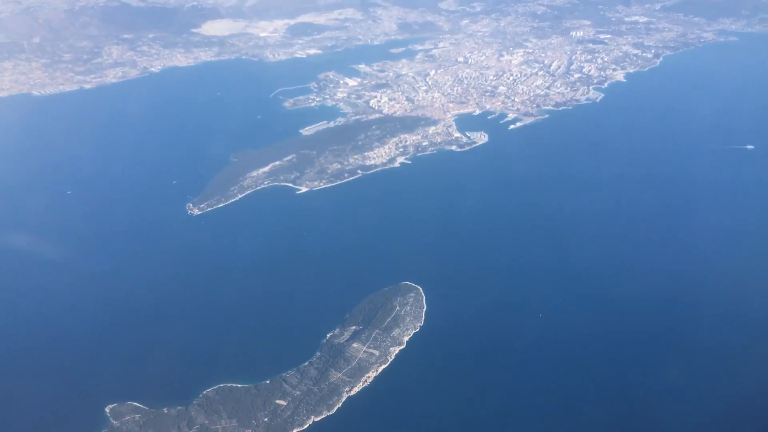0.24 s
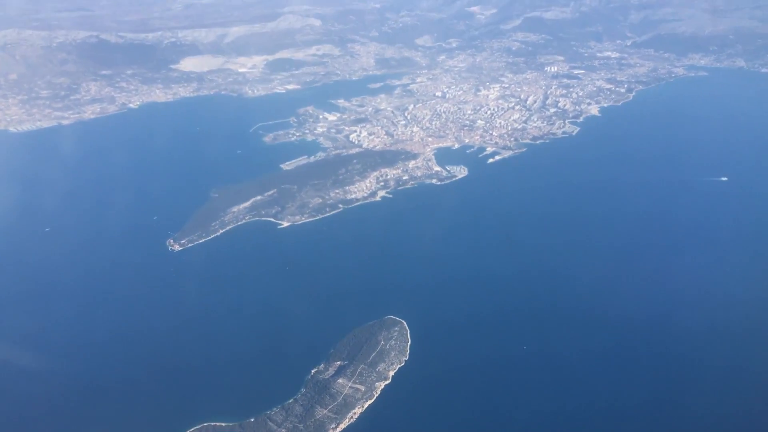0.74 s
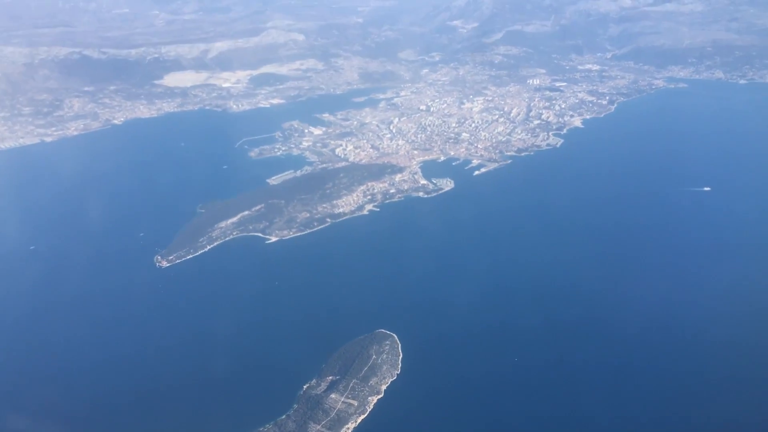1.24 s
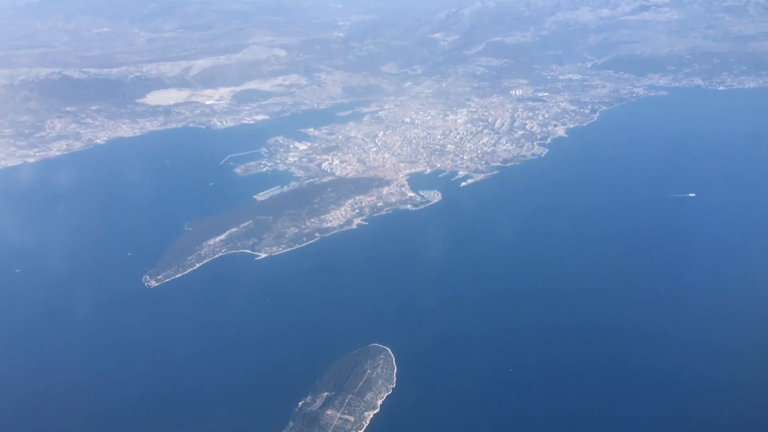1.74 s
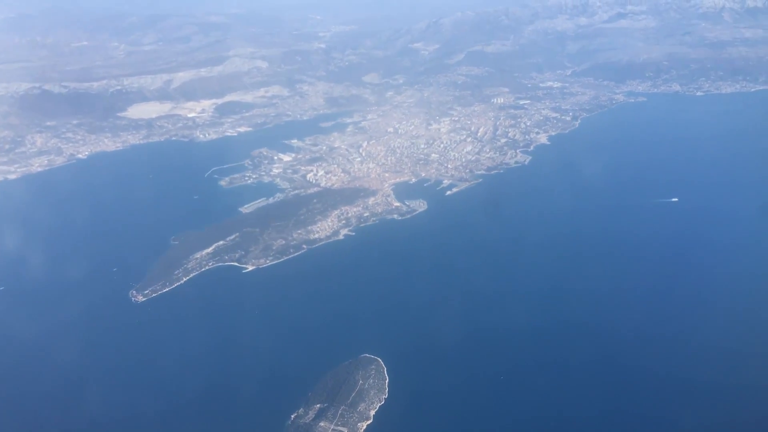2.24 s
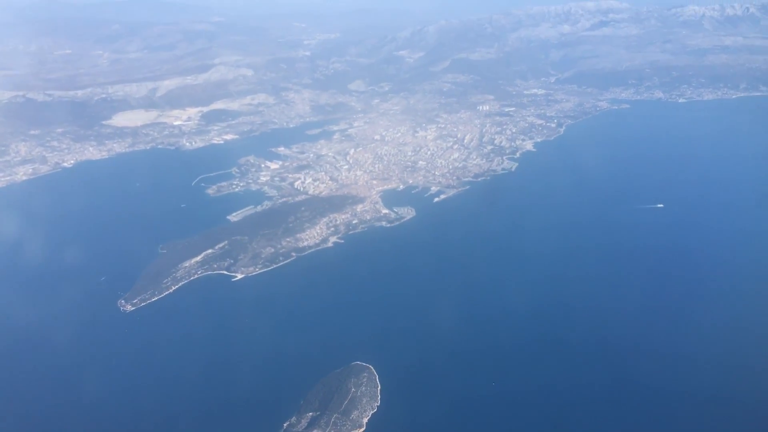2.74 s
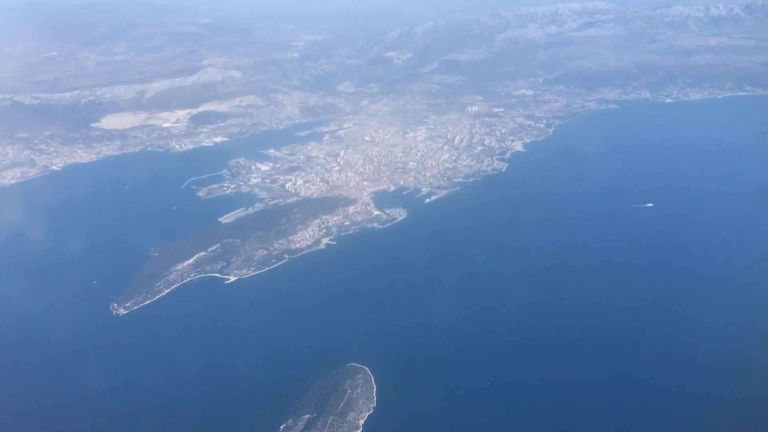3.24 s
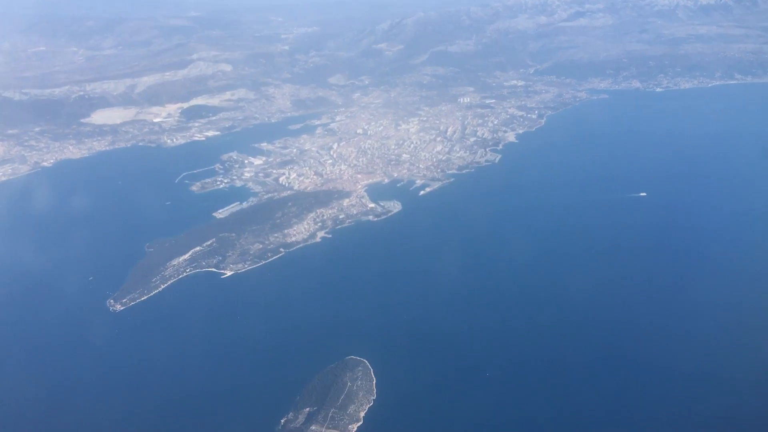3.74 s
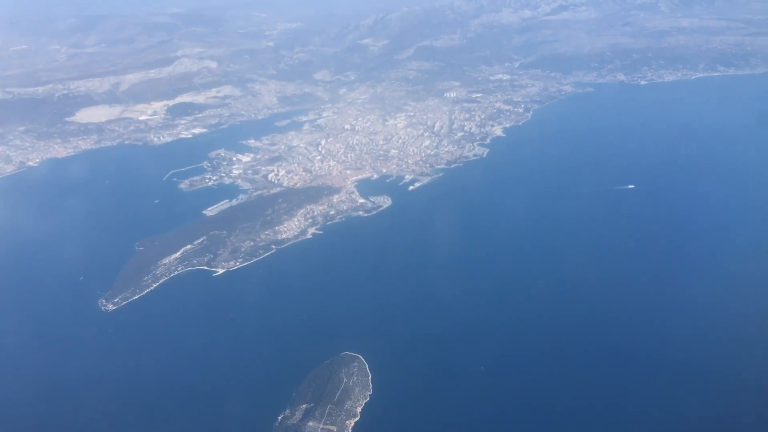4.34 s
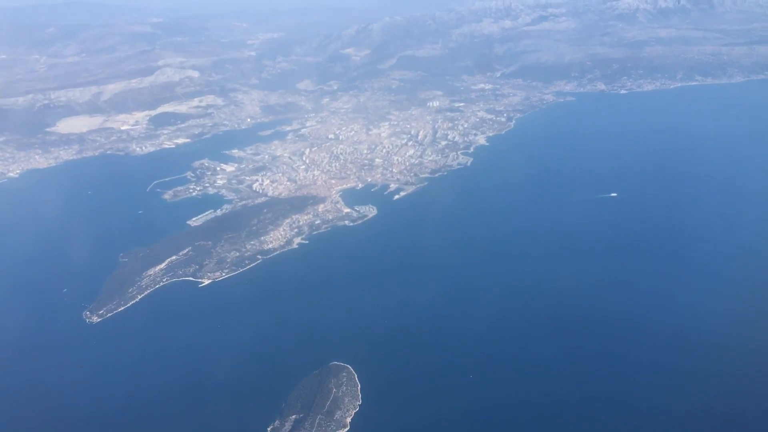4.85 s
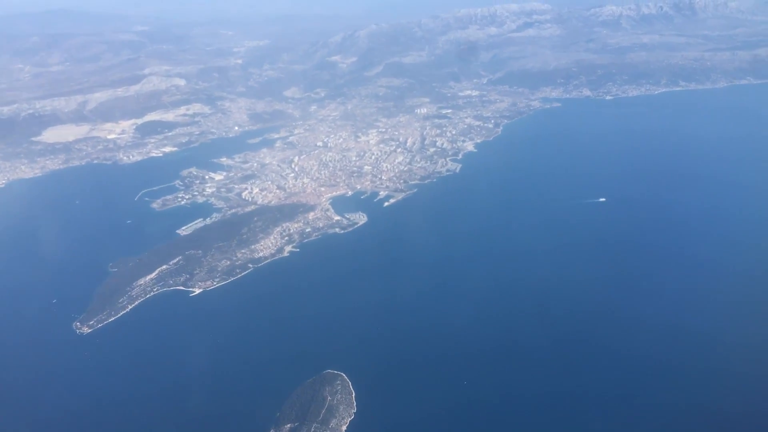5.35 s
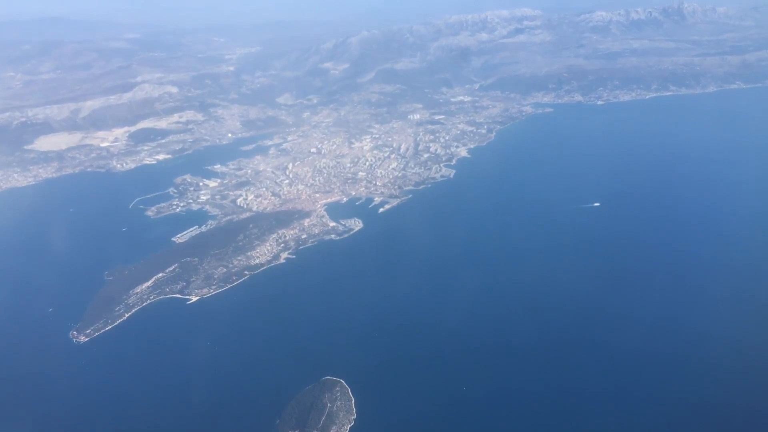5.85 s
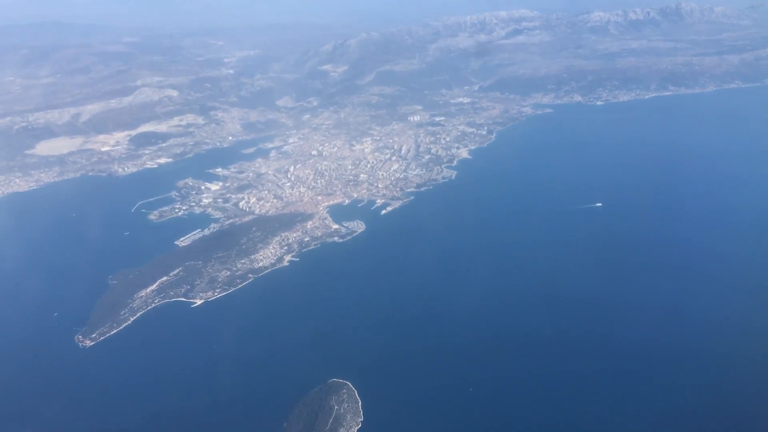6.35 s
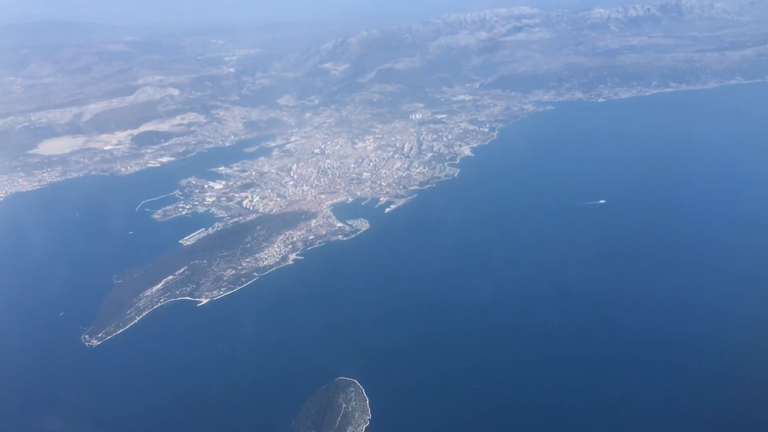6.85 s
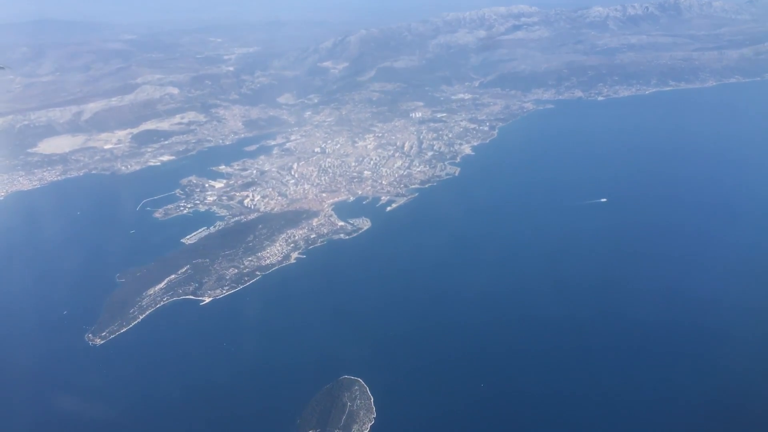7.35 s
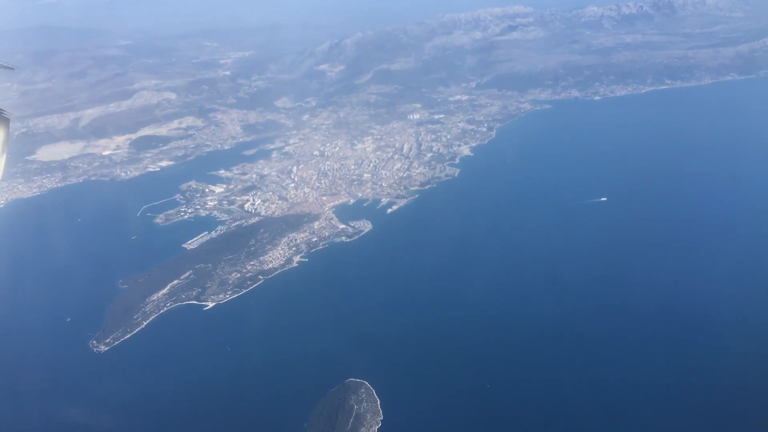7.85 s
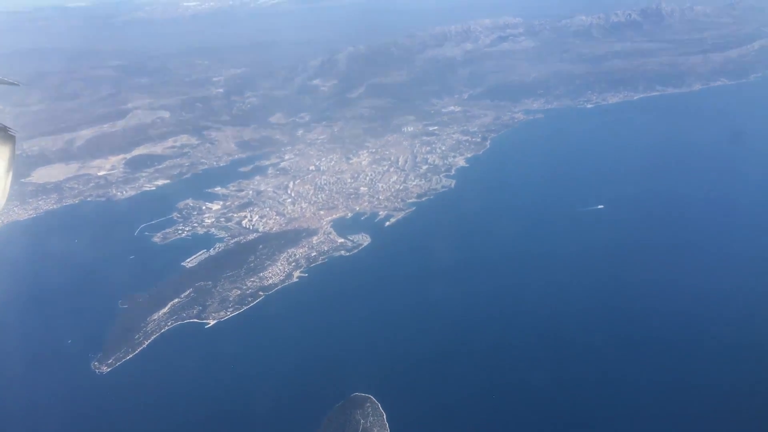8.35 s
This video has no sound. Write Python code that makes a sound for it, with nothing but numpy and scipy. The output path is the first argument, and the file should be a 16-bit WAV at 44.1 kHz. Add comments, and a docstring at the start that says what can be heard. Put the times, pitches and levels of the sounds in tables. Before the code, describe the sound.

Continuous propeller plane cabin noise from the first moment to the last, heard close to the window. A deep buzzing drone slowly beats between full and hollow, its upper octave steady, over muffled, resonant wind rush with soft flickering hiss. Thin airy whistles fade in and out and engine whines sit barely above the roar. Near six seconds come three faint dry plastic clicks. Single-channel sound whose level control gently ducks the roar under each hum swell.

```python
"""Cabin of a twin turboprop airliner in cruise, heard at a window seat.
From the start two propellers hum at one blade rate; one drifts ahead and back, so their fundamentals
nearly cancel and return while the octave stays. Shaped noise roars as airflow through the cabin's
resonances, with faint whines of fuzzy tone, and thin breathy whistles come and go. Past the middle, three
tiny ticks ring plastic modes. A slow gain control turns the roar down whenever the hum swells."""
import sys
import numpy as np
from scipy import signal
from scipy.fft import rfft, irfft, next_fast_len
from scipy.io import wavfile
from scipy.ndimage import uniform_filter1d

SR = 44100
rng = np.random.default_rng(int(sys.argv[2]) if len(sys.argv) > 2 else 0)


def dump_mix(stems):
    """Bounce the given channels to the path in sys.argv[1] as a 16-bit WAV at rate SR."""
    frames = np.atleast_2d(stems).T  # one column per channel
    limited = np.clip(frames, -1, 1)  # hard clip at full scale
    pcm = np.round(limited * 32767).astype(np.int16)
    wavfile.write(sys.argv[1], SR, pcm)


N = 379701
TIME = np.arange(N) / SR  # seconds


def gain_of(db):
    """Decibels to amplitude."""
    return 10 ** (np.asarray(db) / 20)


def evened(x):
    """Scales to rms 1."""
    return x / np.sqrt(np.mean(x ** 2) + 1e-20)


def drift(rate_hz):
    """Smooth random motion of rms 1: noise whose spectrum falls away above the given rate."""
    size = next_fast_len(N)
    hz = np.fft.rfftfreq(size, 1 / SR)
    spectrum = rfft(rng.standard_normal(size)) / (1 + (hz / rate_hz) ** 2)
    return evened(irfft(spectrum, size)[:N])


def narrow_band(hz, width_hz):
    """A breathy tone of rms 1: turbulence gathered around one pitch."""
    angle = 2 * np.pi * hz * TIME
    return evened(drift(width_hz) * np.cos(angle) + drift(width_hz) * np.sin(angle))


# The second propeller's governor hunts: one slow swing ahead and back, furthest ahead at AHEAD_AT_S.
HUNT_PERIOD_S, AHEAD_AT_S = 4.132, 2.075
# Its lead in blade passages: 0 adds the two fundamentals, -0.5 sets them against each other.
LEAD_CENTRE, LEAD_SWING = -0.24, .25


def hunting():
    """The second propeller's lead swings between opposing the first one's hum and reinforcing it."""
    swing = np.cos(2 * np.pi * (TIME - AHEAD_AT_S) / HUNT_PERIOD_S)
    return LEAD_CENTRE + LEAD_SWING * swing


BLADE_HZ = 90.0  # blades passing per second, the same for both propellers
# Blade harmonics 1, 2, 3, .. at the seat, ahead of the gain control.
# Each row: rms level of the first propeller in dB, rms level of the second in dB.
BLADE_LEVELS = [(-15, -12), (-46, -20.5), (-44.5, -51.5), (-57.5, -45), (-62.5, -58.5), (-56, -59.5)]


def propellers(flutter_db=.4, flutter_hz=1.7):
    """Two stacks of blade harmonics interfere; uneven air shakes each one slightly."""
    lead = hunting()
    first_passages = BLADE_HZ * TIME
    second_passages = first_passages + lead
    first, second = np.zeros(N), np.zeros(N)
    for k, (first_db, second_db) in enumerate(BLADE_LEVELS, 1):
        first += gain_of(first_db) * np.cos(2 * np.pi * k * first_passages)
        second += gain_of(second_db) * np.cos(2 * np.pi * k * second_passages)
    shaken = sum(stack * gain_of(flutter_db * drift(flutter_hz)) for stack in (first, second))
    return np.sqrt(2) * shaken  # a cosine of peak sqrt(2) has rms 1


# Colour of the airflow along the fuselage, before the resonances.
# Each row: frequency in Hz, power density in dB per Hz.
AIRFLOW_COLOUR = [(25, -63), (38, -58), (50, -44.5), (160, -46), (295, -66), (400, -57.5), (490, -65),
                  (750, -68.5), (1150, -71.5), (1700, -72.5), (3000, -85), (7000, -99.7), (12500, -100.6),
                  (15600, -107)]
# Resonances and hollows of cabin air, wall panels and trim.
# Each row: centre in Hz, half width in Hz, lift in dB (negative for a hollow).
CABIN_RESONANCES = [(54.1, 3, 7.5), (64.8, 22.8, 8.5), (101.2, 15.7, 5.5), (123.5, 17.4, 9),
                    (192.3, 24.5, 12.5), (257.7, 41, 16.5), (326, 24, 15), (373.4, 32.4, 18),
                    (431.9, 29.3, 11.5), (540, 15, 8.5), (606.4, 53.6, 8), (702, 5.8, 2.5), (885, 37, 5.5),
                    (974, 14, 2.5), (1376, 108, 9.5), (1582, 75, 5), (1820, 22, 5.5), (2273, 16, 4),
                    (2770, 16, 3.5), (3430, 140, 2.5), (4460, 26, 1.5), (4580, 45, 2), (4750, 23, 7.5),
                    (4900, 170, -4.5), (6330, 421, 5.5), (7140, 240, 6), (9650, 170, 3.5), (10300, 315, -4)]


def airflow(echo_share=.18):
    """Steady turbulence on the skin, lifted at each cabin resonance and rippled by near reflections."""
    size = next_fast_len(N)
    hz = np.fft.rfftfreq(size, 1 / SR)
    points_hz, points_db = np.transpose(AIRFLOW_COLOUR)
    colour_db = np.interp(np.log(hz + 1), np.log(points_hz), points_db)
    for centre, width, lift_db in CABIN_RESONANCES:
        colour_db += lift_db * np.exp(-((hz - centre) / width) ** 2)
    # window, wall and seat back return faint copies within about 20 ms, which comb the treble
    echoes = rng.standard_normal(SR // 50) * np.linspace(1, 0, SR // 50)
    echo_spectrum = rfft(echoes / np.linalg.norm(echoes), size)
    treble_share = hz ** 2 / (hz ** 2 + 1200 ** 2)  # half at 1200 Hz
    ripple = 1 + echo_share * echo_spectrum * treble_share
    turbulence = rng.standard_normal(size) * np.sqrt(SR / 2)  # unit power per Hz
    return irfft(rfft(turbulence) * gain_of(colour_db) * ripple, size)[:N]


def gusty(air, depth_db=0.7, gust_hz=12.0, above_hz=4500):
    """The hiss on top of the roar flickers slightly, by a random gain on the treble alone."""
    high_pass = signal.butter(2, above_hz, "high", fs=SR, output="sos")
    hiss = signal.sosfiltfilt(high_pass, air)
    flicker = gain_of(depth_db * drift(gust_hz))
    return air + hiss * (flicker - 1)


# Faint steady whines of the engines and gears, ahead of the gain control.
# Each row: pitch in Hz, half width in Hz, rms level in dB.
MACHINE_WHINES = [(1383, 17, -48), (1562, 6.8, -55.5), (3487, 16, -65), (6570, 25, -79)]


def whines():
    """Fuzzy machine tones, barely above the roar: a narrow band of noise around each pitch."""
    return sum(gain_of(db) * narrow_band(hz, width) for hz, width, db in MACHINE_WHINES)


# Swells of thin air whistles, ahead of the gain control.
# Each row: time of the peak in seconds, half length in seconds, pitch in Hz, level at the peak in dB.
WHISTLE_SWELLS = [(0.546, .45, 11630, -69), (3.2, 1.4, 3480, -62), (3.599, 2.3, 8610, -65.5),
                  (7.599, 2.3, 11720, -69.5), (8.55, .3, 8700, -71)]


def whistles(width_hz=110):
    """Air through narrow gaps: each whistle swells and fades on its own pitch."""
    out = np.zeros(N)
    for peak_s, half_s, hz, db in WHISTLE_SWELLS:
        swell = np.exp(-((TIME - peak_s) / half_s) ** 2 / 2)
        out += gain_of(db) * swell * narrow_band(hz, width_hz)
    return out


# Tiny ticks of plastic close by, ahead of the gain control.
# Each row: start in seconds, peak level in dB.
PLASTIC_TICKS = [(5.7324, -44), (6.0746, -36.5), (6.1619, -42)]
# What the plastic rings with.
# Each row: frequency in Hz, relative level in dB, time to fall by 60 dB in seconds.
PLASTIC_MODES = [(4400, -1, .02), (6500, -5, .015), (7400, -3, .015), (8500, -5, .012), (9400, -6, .012),
                 (11500, -5, .012), (12400, -1, .016), (13600, -4, .012), (14600, -6, .012)]


def ticks():
    """Each tick rings the short, high modes of the plastic."""
    out = np.zeros(N)
    t = np.arange(SR // 20) / SR
    for start_s, peak_db in PLASTIC_TICKS:
        ring = np.zeros(len(t))
        for hz, db, t60 in PLASTIC_MODES:
            decay = gain_of(db - 60 * t / t60)
            ring += decay * np.sin(2 * np.pi * (hz * t + rng.random()))
        ring *= np.minimum(t / .001, 1)  # 1 ms attack
        out[round(start_s * SR):][:len(t)] += gain_of(peak_db) * ring / abs(ring).max()
    return out


def scene():
    """Everything that reaches the seat, summed in one channel."""
    cabin = propellers() + gusty(airflow()) + whines() + whistles() + ticks()
    return cabin[None]


def gain_control(x, target_db=-12.5, start_db=-11.5, settle_s=0.68):
    """Follows the level slowly and steers it towards one loudness."""
    power = uniform_filter1d((x ** 2).mean(0), size=SR // 20)  # mean over 50 ms
    power_db = 10 * np.log10(abs(power) + 1e-12)
    keep = np.exp(-1 / (settle_s * SR))  # one-pole smoothing, settled at start_db beforehand
    heard_db = start_db + signal.lfilter([1 - keep], [1, -keep], power_db - start_db)
    return x * gain_of(target_db - heard_db)


EDGE_HZ = 15790  # top of the band


def record(dry):
    """Gain control, then a steep low-pass as the band limit."""
    low_pass = signal.firwin(1023, EDGE_HZ, window=("kaiser", 9), fs=SR)
    return signal.oaconvolve(gain_control(dry), low_pass[None], "same")


dry = scene()
out = record(dry)
dump_mix(out)
```